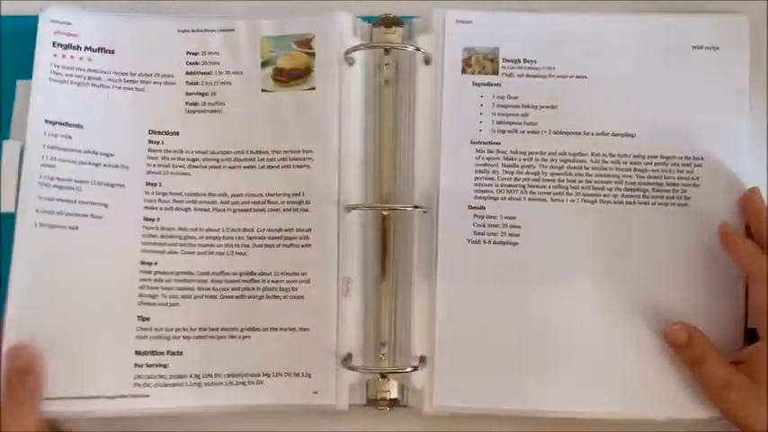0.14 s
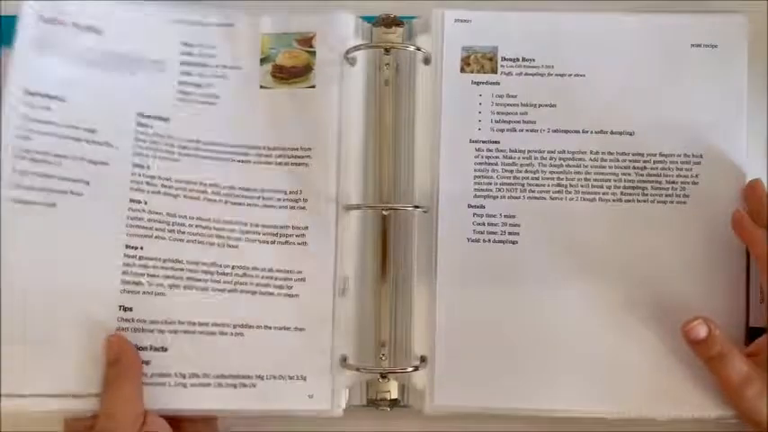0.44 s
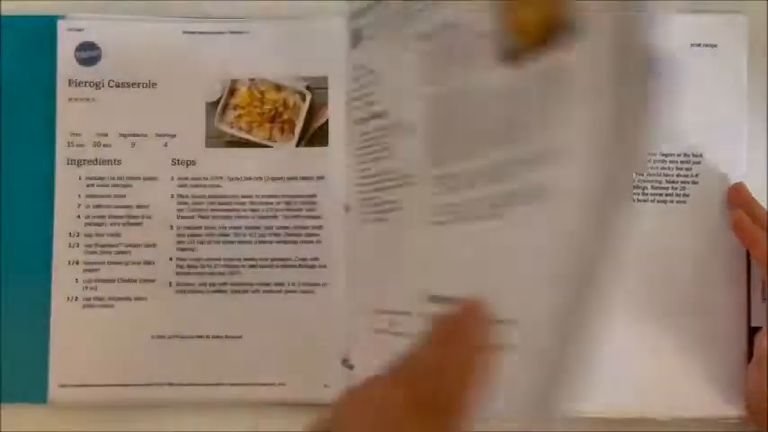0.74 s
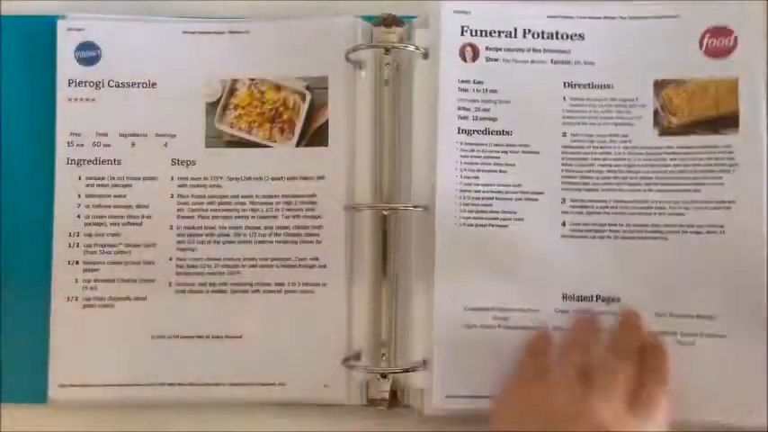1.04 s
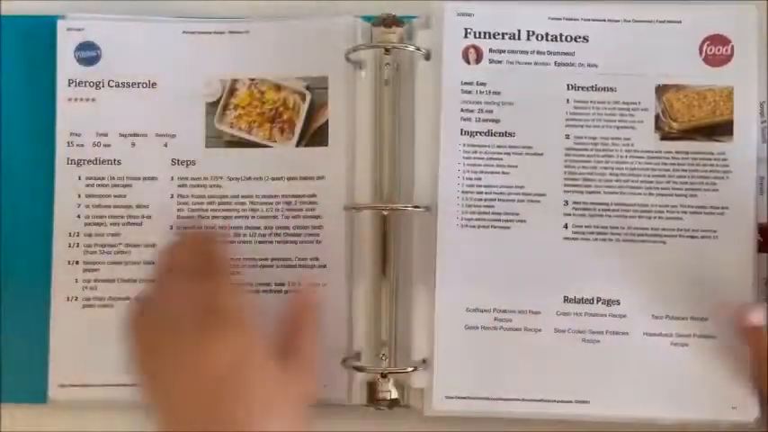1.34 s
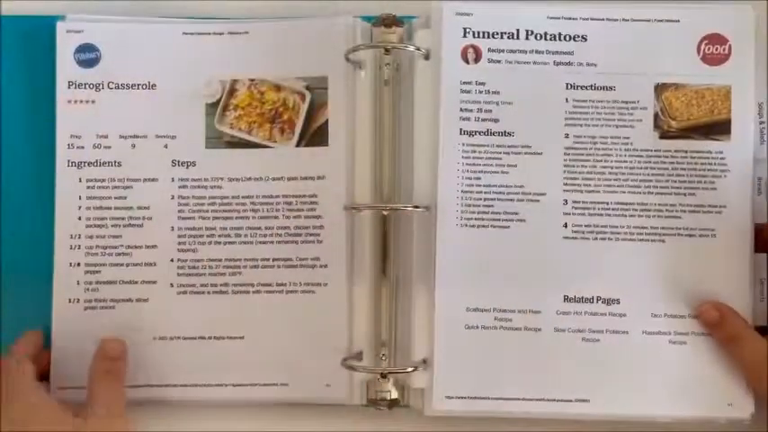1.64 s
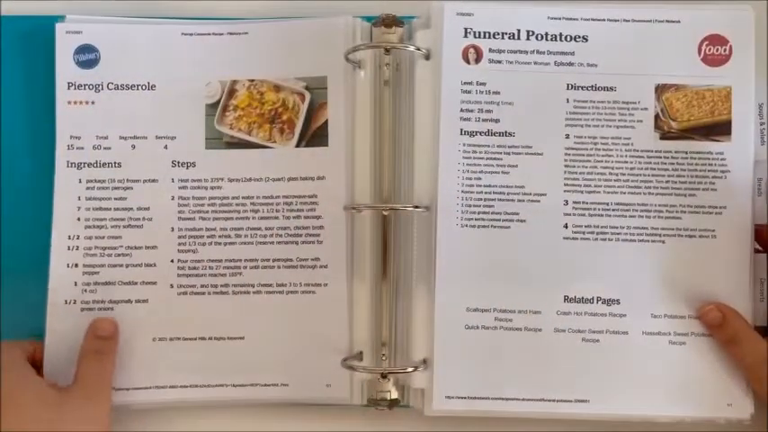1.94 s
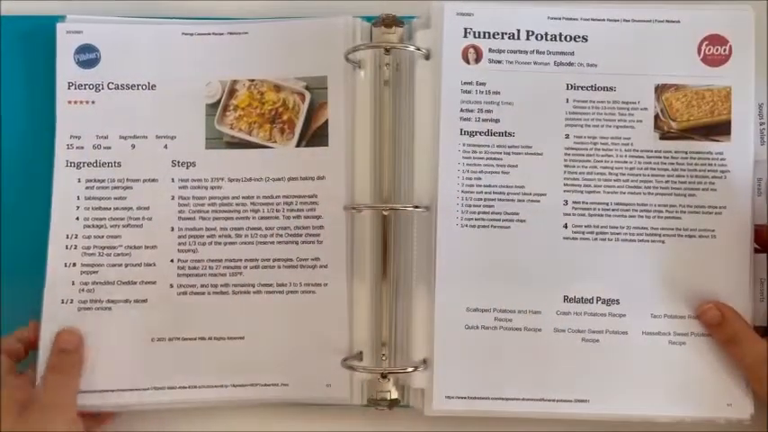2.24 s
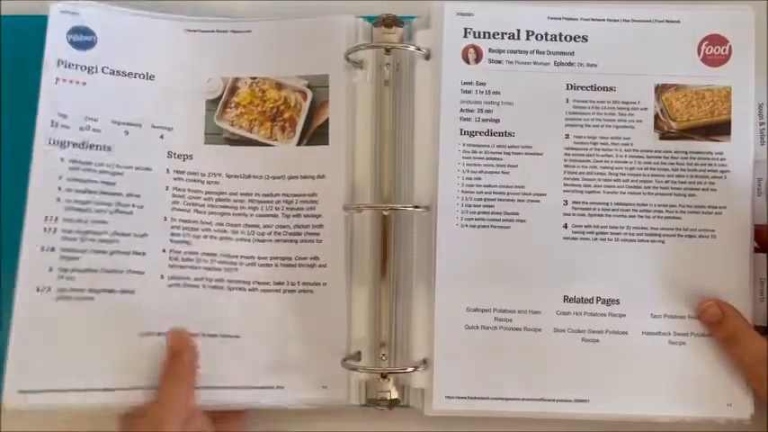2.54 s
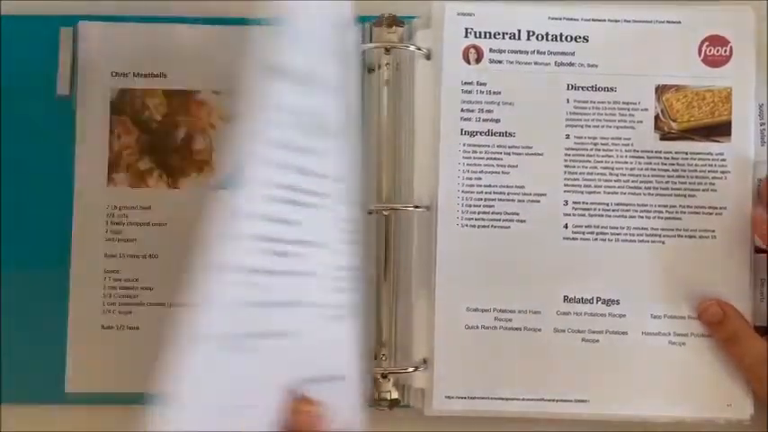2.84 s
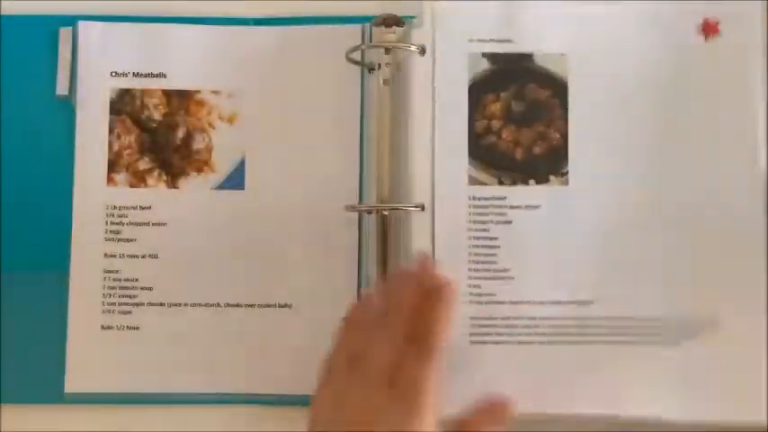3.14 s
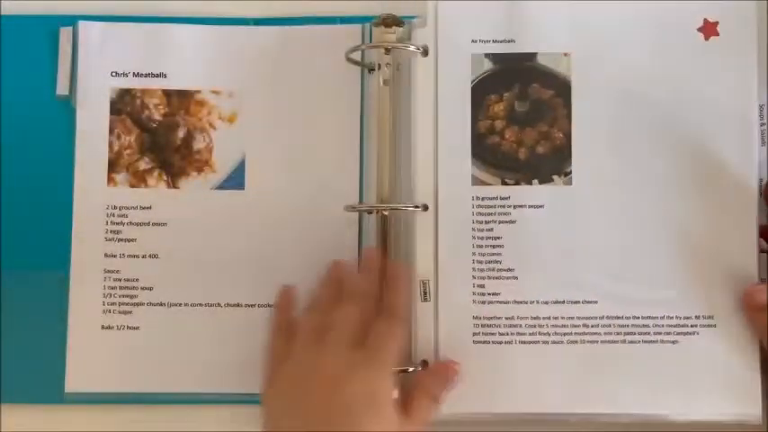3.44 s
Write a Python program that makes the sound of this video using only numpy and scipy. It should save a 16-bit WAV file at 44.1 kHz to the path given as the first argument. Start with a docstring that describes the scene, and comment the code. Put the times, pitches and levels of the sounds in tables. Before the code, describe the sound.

Two page turns in a ring binder: crinkly plastic rustle, a soft slap, then a louder one.

```python
"""Plastic sleeves crinkle, slide and slap as two pages are turned in a ring binder, close up in a small room.
Crinkles and slaps are short coloured noise bursts; slides are swelling hiss with tiny slips; drags rasp.
Fingers tap and stroke the pages with duller bursts and hiss, and the binder thumps as a few damped modes.
The room answers with early reflections and a decaying noise tail, over a quiet steady rumble."""
import sys
import numpy as np
from scipy import signal
from scipy.fft import rfft, irfft, next_fast_len
from scipy.io import wavfile
from scipy.ndimage import uniform_filter1d, map_coordinates

SR = 44100
rng = np.random.default_rng(int(sys.argv[2]) if len(sys.argv) > 2 else 0)


def generate_wav(signal):
    """Clip the signal to [-1, 1] and save it as 16-bit WAV at the path in sys.argv[1]."""
    frames = np.transpose(np.atleast_2d(signal))
    scaled = np.clip(frames, -1, 1) * 32767
    pcm = np.round(scaled).astype(np.int16)
    wavfile.write(sys.argv[1], SR, pcm)


N = 158760  # 3.6 s

# A sleeve buckles: (time [s], level [dB], decay [s], body lift [dB], edge lift [dB])
CRINKLES = [(0.134, -52.5, 0.002, 5.5, -5), (0.1851, -48, 0.0043, 3, -6.5), (0.2401, -42, 0.0024, 1, -9.5),
            (0.351, -57, 0.0022, -17, 0), (0.3749, -45, 0.0013, 15, 1.5), (0.391, -44, 0.0016, 19.5, -7),
            (0.4291, -38.5, 0.0011, 18, 6), (0.4665, -45.5, 0.0011, 15.5, -8.5),
            (.611, -55.5, 0.0033, 2, -30), (0.637, -51, 0.0016, 6, -4), (0.839, -60, 0.0013, -12, 0),
            (1.171, -52, 0.0049, -34, -17), (1.862, -57.5, 0.0026, -13, -7), (1.923, -47, 0.0056, -4.5, -9),
            (2.0014, -57.5, 0.0017, 3, -30), (2.2366, -56.5, 0.0048, -1, -40),
            (2.272, -51.5, 0.0048, -17, -13), (2.325, -52, 0.0043, -5.5, -19), (2.478, -58, 0.0013, 2, -57),
            (2.538, -51, 0.0018, 2, -22), (2.557, -47, 0.0023, 0, -28), (2.892, -51, .004, 11, -30.5),
            (2.908, -55.5, 0.0043, -0.5, -16.5), (3.000, -50, 0.0021, -3, -24), (3.018, -46, 0.0028, 21, 0),
            (3.0869, -31, 0.0016, -55, -24), (3.286, -46.5, 0.003, 7, -12)]
# Common colour of the crinkles: (frequency [Hz], level [dB])
CRINKLE_COLOUR = [(100, -51), (300, -9.5), (550, 0), (1200, -8), (2100, 2.5), (3500, -2), (5500, -10.5),
                  (8000, 1), (10000, 2.5), (11700, 13), (14000, -25)]
# Plastic drags with a narrow rasp:
# (time of the peak [s], level [dB], centre [Hz], half-width [Hz], rise [s], fall [s])
DRAGS = [(2.785, -53.5, 1900, 254, 0.06, 0.022), (3.589, -67.5, 1660, 130, 0.043, 0.057)]
# A sleeve or a hand slides: (time of the fastest moment [s], level [dB], rise [s], fall [s],
# tilt [dB per octave], band that the sheet favours [Hz])
STROKES = [(0.144, -55, 0.054, 0.038, 1, 2080), (0.26, -51, 0.021, 0.039, 5.5, 4980),
           (.54, -55.5, 0.14, 0.094, -4.5, 544), (.90, -47.5, 0.064, 0.046, -3.5, 644),
           (1.013, -54, 0.36, 0.02, 5.5, 674), (1.28, -63, 0.24, 0.2, -3, 1230),
           (1.571, -53, 0.022, 0.044, -17, 690), (1.73, -50, 0.01, 0.023, -8.5, 780),
           (2.07, -66.5, 0.23, 0.2, -1.5, 1050), (2.271, -59.5, 0.023, 0.036, 3.5, 2350),
           (2.56, -48.5, 0.029, 0.024, 1.8, 2200), (2.759, -52, 0.09, 0.1, 0.5, 790),
           (3.04, -46, 0.033, 0.072, 0, 630), (3.324, -54.5, 0.071, 0.02, 3, 9000),
           (3.59, -65.5, 0.031, 0.055, -6.5, 794)]
# Common colour of the slides: (frequency [Hz], level [dB])
SLIDE_COLOUR = [(60, -5.5), (220, -0.5), (500, -3.5), (900, 2), (1450, -1), (2050, 2), (3600, -1),
                (5300, -9), (8500, -8), (10200, -8), (11700, -7.5), (13200, -38.5), (16000, -57)]
# Part of the sliding that is unlike at the two ports: (frequency [Hz], level [dB])
PORT_DIFFERENCE = [(60, -22), (300, -9.5), (1400, -4), (8000, -11)]
# A sleeve lands on the stack: (time [s], level [dB], decay [s], bright up to [Hz], body [Hz])
SLAPS = [(.9135, -37.5, 0.0053, 2590, 1190), (.928, -32, 0.0041, 2620, 498), (.984, -42, 0.0067, 1180, 560),
         (1.181, -47.5, 0.0093, 3280, 1780), (1.190, -34, 0.0023, 1380, 346),
         (3.063, -27, 0.0081, 593, 298), (3.0785, -22.5, 0.0026, 3260, 1810),
         (3.082, -15.5, 0.0039, 3280, 1010), (3.090, -20, 0.004, 1290, 516)]
# Common colour of the slaps: (frequency [Hz], level [dB])
SLAP_COLOUR = [(50, 13.5), (150, 3.5), (330, -0.5), (550, -1), (1050, 0), (1450, -8.5), (1950, -4),
               (3000, -7.5), (5000, -15), (9000, -17.5), (12000, -10.5), (15000, -32.5)]
# Fingertips land on the pages: (time [s], level [dB], decay [s], bright up to [Hz], body [Hz])
TAPS = [(.467, -39.5, 0.0043, 900, 417), (1.487, -44, 0.0025, 3300, 680), (1.505, -39, 0.0034, 3040, 641),
        (1.6545, -38, 0.0015, 2770, 615), (1.848, -57, 0.0051, 1460, 790), (1.98, -50.5, 0.003, 1800, 950),
        (2.045, -51.5, 0.011, 1530, 870)]
# Common colour of the taps: (frequency [Hz], level [dB])
TAP_COLOUR = [(60, 11.5), (350, -4.5), (570, -2.5), (950, -2), (1250, -14.5), (2100, -5), (2850, -17.5),
              (3500, -9), (6500, -23.5), (14000, -34)]
# Resonances of the covers and the stack of pages: (frequency [Hz], lift [dB])
COVER_PEAKS = [(221, 5), (338, 6), (447, 4), (551, 7), (757, 4), (874, 3.5), (1016, 4.5), (1189, 4),
               (1746, 2.5), (1880, 2.5), (2110, 3.5)]
# The binder is pushed against the table: (time [s], level [dB], tilt [dB per octave])
THUMPS = [(0.473, -46, -0.5), (0.839, -48.5, -12), (0.94, -25, -8.5), (1.206, -34.5, -5.5),
          (1.513, -38.5, 0.5), (1.662, -39, -1), (1.766, -49, -11), (2.584, -48.5, -11.5),
          (2.904, -44, -12), (3.097, -19, -0.5)]
# Modes of the binder on the table: (frequency [Hz], level [dB], time to fall by 60 dB [s])
BINDER_MODES = [(55, -8.5, 0.12), (73.3, 5.5, 0.18), (112, -4.5, 0.27), (137.4, 0, .15), (222.6, -9, .14)]
# Decay of the room: (frequency [Hz], time to fall by 60 dB [s])
ROOM_DECAY = [(100, 0.56), (600, 0.27), (3000, 0.31), (13000, 0.16)]
# Colour of the rumble: (frequency [Hz], level [dB])
ROOM_TONE = [(20, -15.5), (66, 1.5), (110, -8.5), (250, -20.5), (1000, -27.5), (3000, -41), (8000, -43),
             (14000, -74.5)]
# Level difference of the microphone ports: (frequency [Hz], left over right [dB])
PORT_BALANCE = [(150, -0.5), (300, -1.5), (600, 3.5), (4400, 3), (8000, 1.5), (13000, 0)]
# Phase difference of the microphone ports: (frequency [Hz], lead of the left [rad])
PORT_LEAD = [(250, 0), (750, .6), (1650, -.7), (2900, .8), (6900, .3), (7850, .95), (8900, -.4),
             (9700, -2.2), (11800, -6), (13000, -6.4)]

CRINKLE_RISE, LANDING_RISE = 0.83, 0.52  # rise of a cluster of contacts over its decay
SLIPS_PER_S, SLIP_SHARE, SLIP_SPREAD_DB = 700, 0.25, 2  # SLIP_SHARE: power share of the slips
SHEET_DB, SHEET_OCTAVES = 4.5, 0.45  # lift and width of the band that a sheet favours
PATCHY_DB, UNSTEADY_DB = 2, 1.2  # unevenness over the bands, and of the grip
BODY_DB = 8  # lift of a landing around its body frequency
COVER_WIDTH_HZ, COVER_WIDENS = 22, 0.013  # half-width of a resonance, and its growth per Hz
COVER_FULL_DB, COVER_GROWS = -17.5, 0.23  # blows this hard ring the covers fully, softer ones less
SLAP_PAN_DB, TAP_PAN_DB = -1.5, 3  # left over right: sleeves fall to the right, fingers work on the left page
THUMP_ATTACK_S = 0.0024
ROOM_DB, WALLS_DB, BOOM_ROOM_DB = -10, -6, -2.5  # tail, early answer, thumps' send to the room
ROOM_TONE_DB = -62.5
LOW_CUT_HZ, TOP_HZ = 51, 16300


def crinkles(body_hz=650, edge_hz=12500):
    """Each buckle of a sleeve is a short snap with its own body and edge."""
    out = np.zeros(N)
    for time, db, decay, body, edge in CRINKLES:
        def colour(hz):
            own = body * hump(hz, body_hz, 1.31) + edge * hump(hz, edge_hz, 0.68)
            return along(CRINKLE_COLOUR, hz) + own
        add(out, time, amp(db) * burst(decay, CRINKLE_RISE, colour))
    return out


def drags():
    """Dragged plastic sticks and slips, heard as noise in one narrow band that swells and fades."""
    out = np.zeros(N)
    for time, db, centre, width, rise, fall in DRAGS:
        rasp = filtered(rng.standard_normal(N), lambda hz: 1 / (1 + ((hz - centre) / width) ** 2))
        out += amp(db) * unit(rasp) * swell(time, rise, fall, shape=0.85)
    return out


def sliding(knee_hz=600):
    """Plastic on plastic hisses brightly, skin on plastic is duller; the grip is uneven."""
    out = np.zeros((2, N))
    for time, db, rise, fall, tilt, sheet_hz in STROKES:
        def colour(hz):
            tilted = tilt * np.log2(1 + (hz / knee_hz) ** 2) / 2  # acts above the knee
            sheet = SHEET_DB * hump(hz, sheet_hz, SHEET_OCTAVES)
            return along(SLIDE_COLOUR, hz) + tilted + sheet + cover_db(hz)
        out += amp(db) * swell(time, rise, fall) * friction(colour, SLIP_SHARE)
    return patchy(out) * amp(UNSTEADY_DB * wobble(60))


def friction(colour_db, slip_share):
    """Hiss and sparse tiny slips share one colour, partly unlike at the two ports."""
    strength = amp(SLIP_SPREAD_DB * rng.standard_normal(N))
    slips = rng.standard_normal((2, N)) * strength * (rng.random(N) < SLIPS_PER_S / SR)
    hiss = rng.standard_normal((2, N))
    rub = np.sqrt(1 - slip_share) * hiss + np.sqrt(slip_share) * unit(slips)

    def mid_side_response(hz):
        return amp(colour_db(hz)) * np.array([np.ones_like(hz), amp(along(PORT_DIFFERENCE, hz))])

    mid, side = filtered(rub, mid_side_response)
    return unit(np.array([mid + side, mid - side]))


def patchy(x):
    """The bending sheet favours ever different bands."""
    z = signal.stft(x, nperseg=256)[2]
    over_bands = uniform_filter1d(rng.standard_normal(z.shape[1:]), size=3, axis=0)
    field = uniform_filter1d(over_bands, size=8, axis=1)  # smoothed over time too
    return signal.istft(z * amp(PATCHY_DB * unit(field)), nperseg=256)[1][:, :N]


def slaps():
    """Sleeves slap down on the stack as short bursts of contacts."""
    return landings(SLAPS, SLAP_COLOUR)


def taps():
    """Fingertips land on the pages as short bursts of contacts."""
    return landings(TAPS, TAP_COLOUR)


def landings(rows, colour):
    """Each landing has its own body and treble limit; harder ones ring the covers more."""
    out = np.zeros(N)
    for time, db, decay, bright_hz, body_hz in rows:
        cover_reach = amp(COVER_GROWS * min(db - COVER_FULL_DB, 0))

        def landing_colour(hz):
            body = BODY_DB * hump(hz, body_hz, SHEET_OCTAVES)
            dulling = 10 * np.log10(1 + (hz / bright_hz) ** 3.2)
            return along(colour, hz) + cover_reach * cover_db(hz) + body - dulling
        add(out, time, amp(db) * burst(decay, LANDING_RISE, landing_colour))
    return out


def cover_db(hz):
    """The lift that the resonances of covers and stack give to each frequency."""
    lift = 0
    for centre, db in COVER_PEAKS:
        width = COVER_WIDTH_HZ + COVER_WIDENS * centre
        lift = lift + db / (1 + ((hz - centre) / width) ** 2)
    return lift


def thumps():
    """The weight follows the contact: binder and table boom briefly."""
    out = np.zeros(N)
    for time, db, tilt in THUMPS:
        boom = ring(BINDER_MODES, tilt)
        attack = 1 - np.exp(-np.arange(len(boom)) / SR / THUMP_ATTACK_S)
        add(out, time, amp(db) * boom * attack)
    return out


def ring(modes, tilt_db):
    """Sum of damped sine modes, tilted per octave about 100 Hz."""
    t = np.arange(SR // 2) / SR
    out = np.zeros(len(t))
    for hz, db, t60 in modes:
        fading_db = db + tilt_db * np.log2(hz / 100) - 60 * t / t60
        out += amp(fading_db) * np.sin(2 * np.pi * hz * t)
    return out


def room(x, near_s=0.0074):
    """Nearby surfaces answer at once, then a noise tail dies away at its own pace in each band."""
    hz, t, z = signal.stft(rng.standard_normal((2, SR // 2)), SR, nperseg=256)
    decay = amp(-60 * t / along(ROOM_DECAY, hz)[:, None])
    tail = signal.istft(z * decay, SR, nperseg=256)[1]
    age = np.arange(tail.shape[1]) / SR
    walls = rng.standard_normal(tail.shape) * age * np.exp(-2 * age / near_s)
    tail = tail * (1 - np.exp(-age / near_s))
    answer = amp(ROOM_DB) * tail / np.linalg.norm(tail[0])
    answer += amp(WALLS_DB) * walls / np.linalg.norm(walls[0])
    mid, side = signal.fftconvolve(x[None], answer, axes=1)[:, :N]
    side = filtered(side, lambda hz: hz / (hz + 400))  # the bass stays nearly alike at both ports
    return np.array([mid + side, mid - side]) / np.sqrt(2)


def rumble():
    """Steady coloured noise, without slips, lies under everything."""
    return amp(ROOM_TONE_DB) * friction(lambda hz: along(ROOM_TONE, hz), 0)


def burst(decay_s, build_up, colour_db, size=8192):
    """A dying cluster of tiny contacts with a causal colour; rms 1 if packed into 10 ms."""
    t, hz = np.arange(size) / SR, np.fft.rfftfreq(size, 1 / SR)
    age = t / max(decay_s, 1e-4)
    fade = np.exp(-age) * (1 - np.exp(-age / build_up))
    z = rfft(rng.standard_normal(size) * fade)
    even = irfft(z / (np.abs(z) + 1e-9)) * np.sqrt(fade)  # flatten the spectrum, then fade again
    # folding the cepstrum makes the colour minimum-phase, so nothing sounds ahead of the contact
    cepstrum = irfft(np.log(amp(colour_db(hz))))
    cepstrum[1:size // 2] *= 2
    cepstrum[size // 2:] = 0
    x = irfft(rfft(even) * np.exp(rfft(cepstrum)))
    return unit(x) * np.sqrt(SR / 100 / size)


def swell(s, rise, fall, shape=1.456):
    """A movement speeds up until s and slows down again."""
    t = np.arange(N) / SR - s
    return np.exp(-np.abs(t / np.where(t < 0, rise, fall)) ** shape / 2)


def wobble(rate):
    """A smooth random curve, rate knots a second."""
    knots = rng.standard_normal(int(N * rate / SR) + 4)
    return map_coordinates(knots, [np.arange(N) * rate / SR])


def hump(hz, centre, octaves):
    """A broad bell over frequency, 1 at its centre."""
    return np.exp(-(np.log2((hz + 1) / centre) / octaves) ** 2)


def along(points, hz):
    """(Hz, value) points read on a log frequency axis."""
    f, v = np.transpose(points)
    return np.interp(np.log(hz + 1), np.log(f + 1), v)


def filtered(x, response):
    """x shaped by a response of frequency."""
    m = next_fast_len(N + SR // 2)
    return irfft(rfft(x, m) * response(np.fft.rfftfreq(m, 1 / SR)), m)[..., :N]


def amp(db):
    """Decibels to gain."""
    return 10 ** (np.asarray(db) / 20)


def unit(x):
    """x at rms 1."""
    return x / np.sqrt(np.mean(x ** 2) + 1e-20)


def add(track, s, x):
    """Mix x into the track at s seconds."""
    i = int(round(s * SR))
    track[i:i + len(x)] += x[:max(N - i, 0)]


def panned(x, db):
    """x at both ports, db stronger on the left."""
    return x * amp(np.array([[db], [-db]]) / 2)


def scene():
    """All the handling in the room, over a quiet rumble; the sliding is heard without room."""
    sleeves = crinkles() + drags()
    slap, tap, boom = slaps(), taps(), thumps()
    direct = sleeves + panned(slap, SLAP_PAN_DB) + panned(tap, TAP_PAN_DB) + boom
    reflected = room(sleeves + slap + tap + amp(BOOM_ROOM_DB) * boom)
    return direct + reflected + sliding() + rumble()


def record(dry):
    """The two ports differ in level and phase; the deepest bass and the top are cut."""
    ports = np.array([[.5], [-.5]])  # each port takes half of the difference

    def port_response(hz):
        return amp(ports * along(PORT_BALANCE, hz)) * np.exp(1j * ports * along(PORT_LEAD, hz))

    heard = filtered(dry, port_response)
    low_cut = signal.butter(4, LOW_CUT_HZ, "high", fs=SR, output="sos")
    heard = signal.sosfilt(low_cut, heard)
    return filtered(heard, lambda hz: hz < TOP_HZ)


dry = scene()
out = record(dry)
generate_wav(out)
```